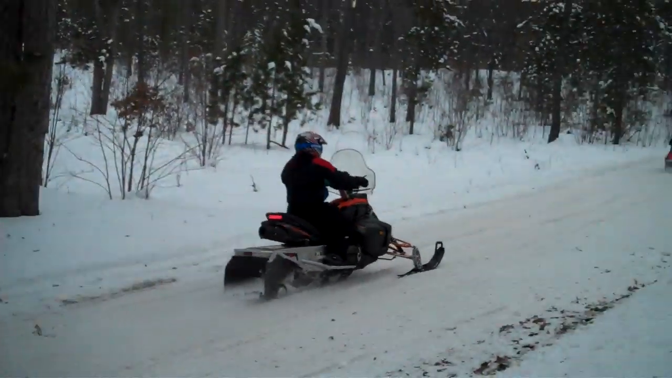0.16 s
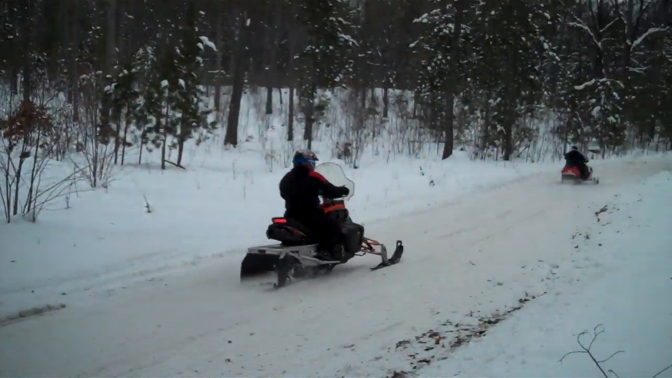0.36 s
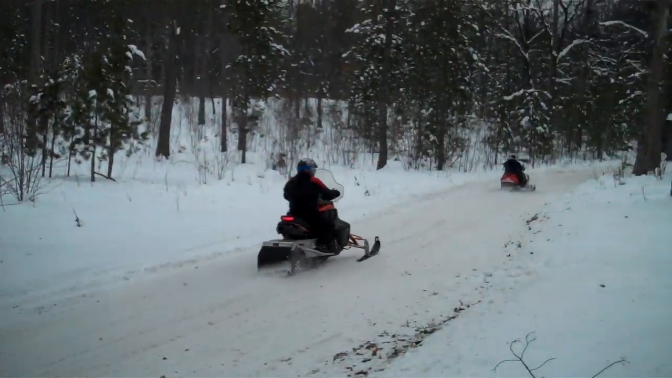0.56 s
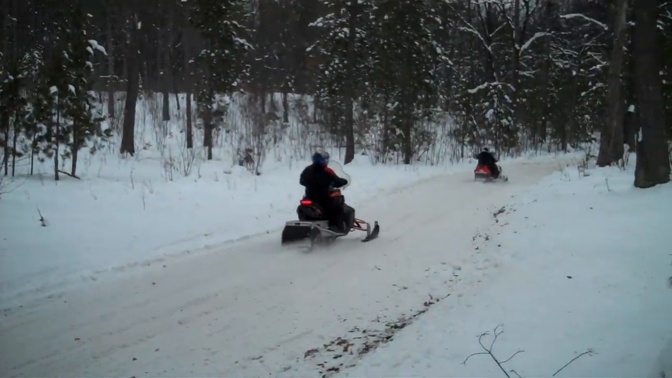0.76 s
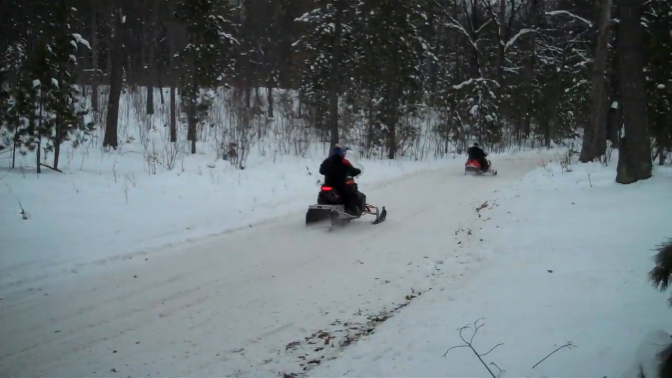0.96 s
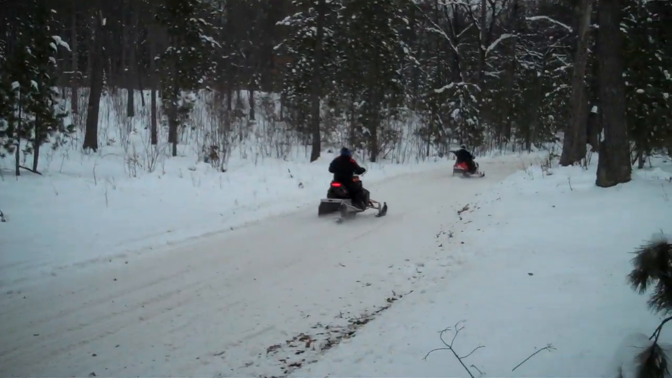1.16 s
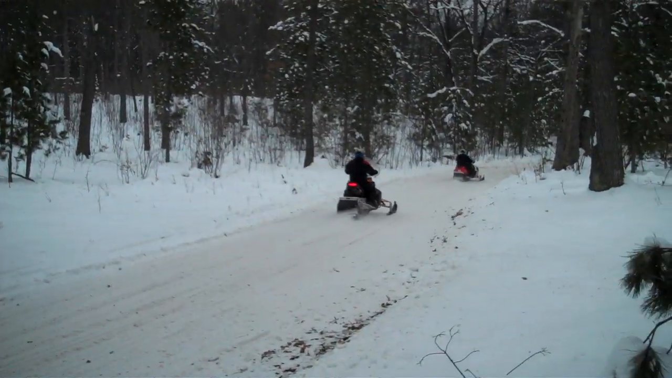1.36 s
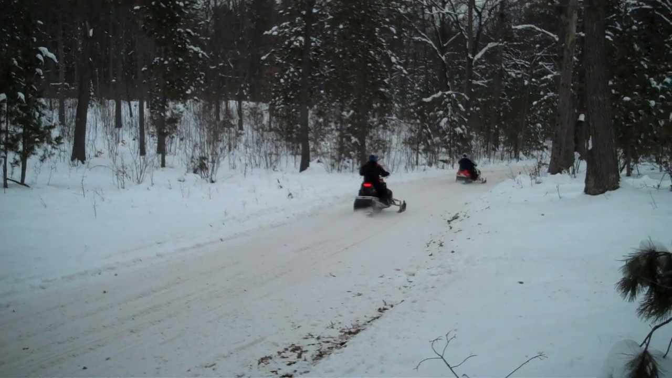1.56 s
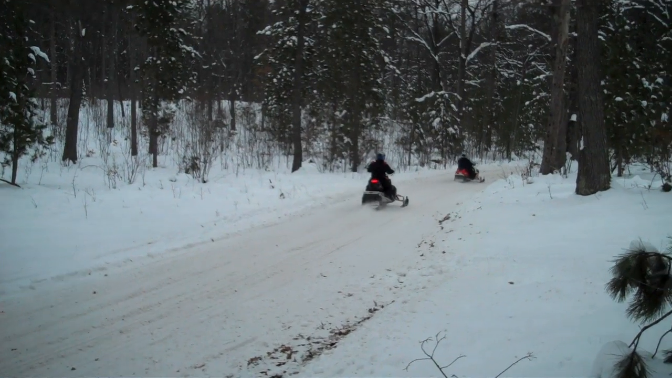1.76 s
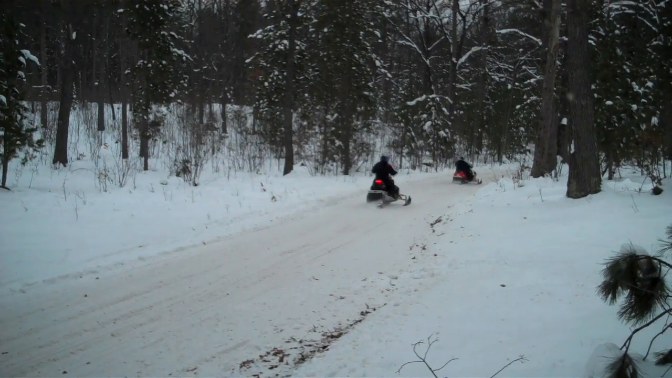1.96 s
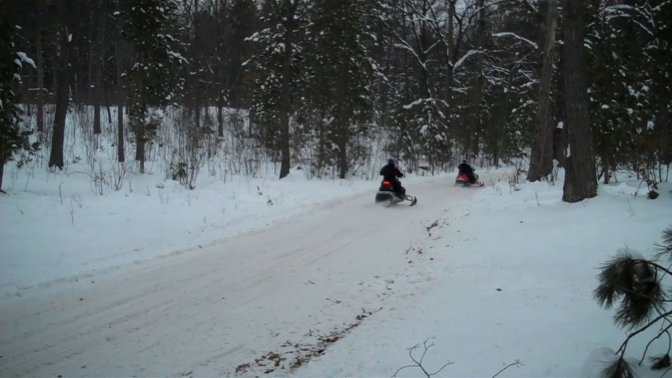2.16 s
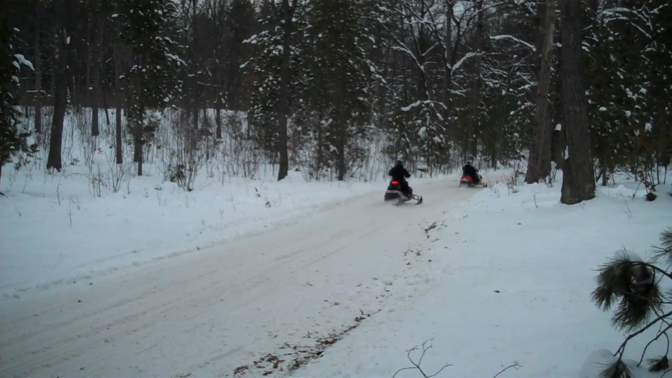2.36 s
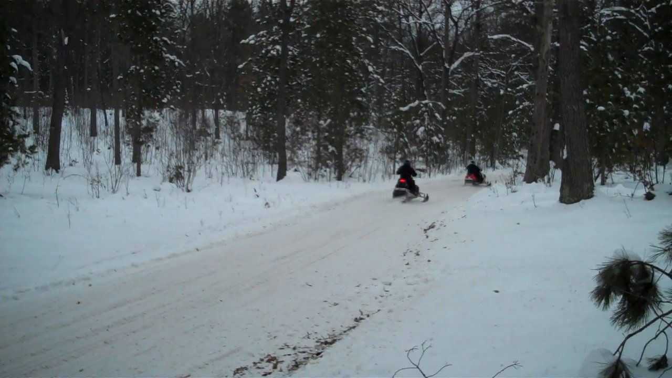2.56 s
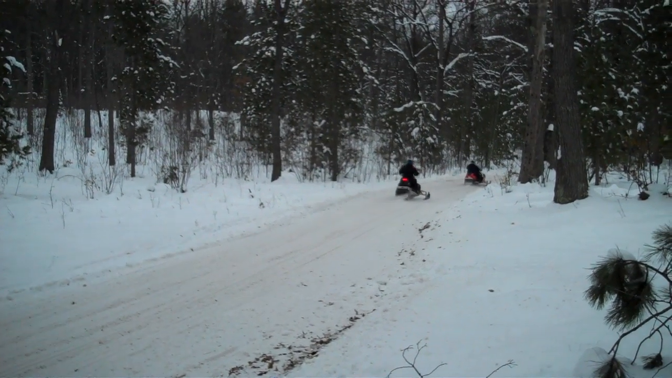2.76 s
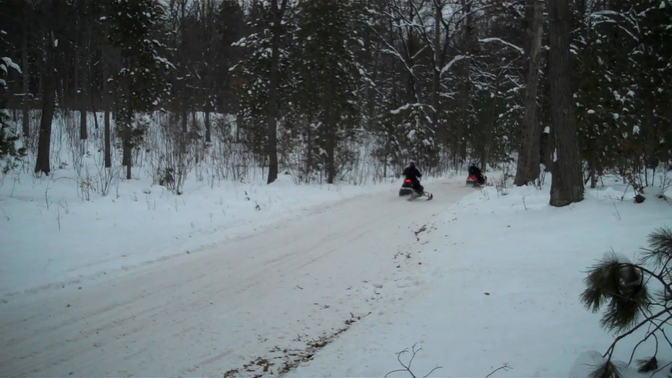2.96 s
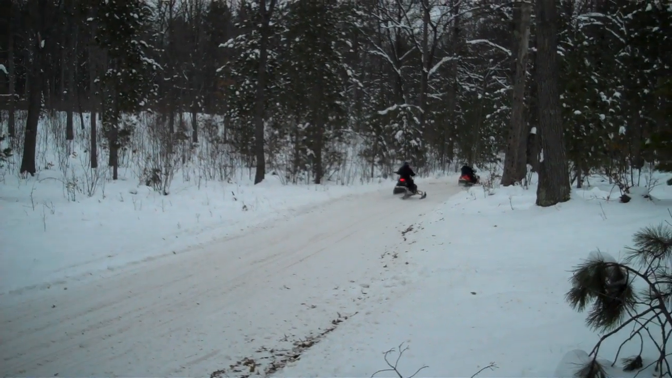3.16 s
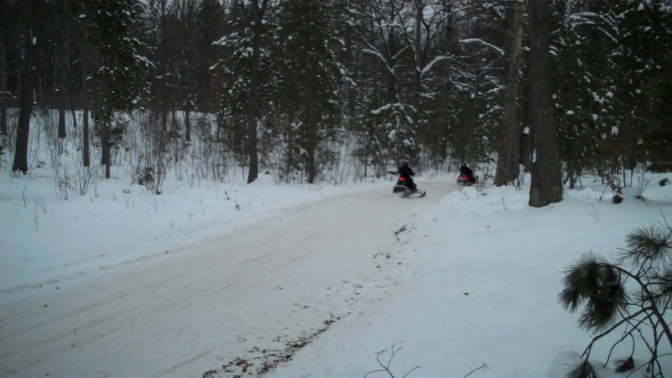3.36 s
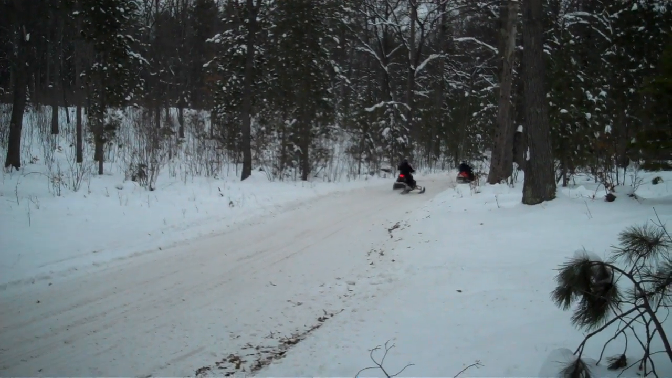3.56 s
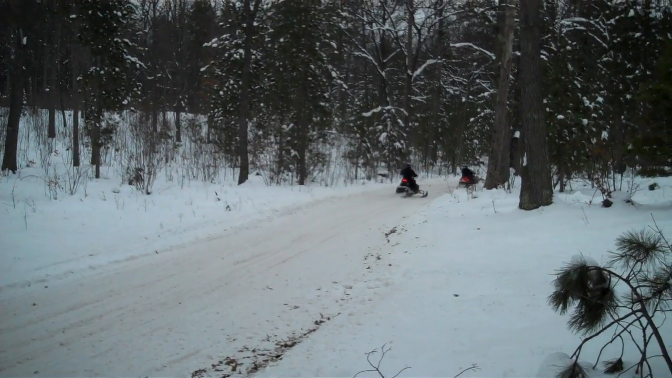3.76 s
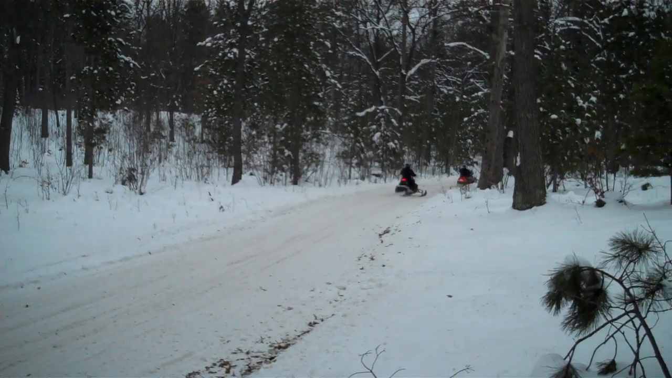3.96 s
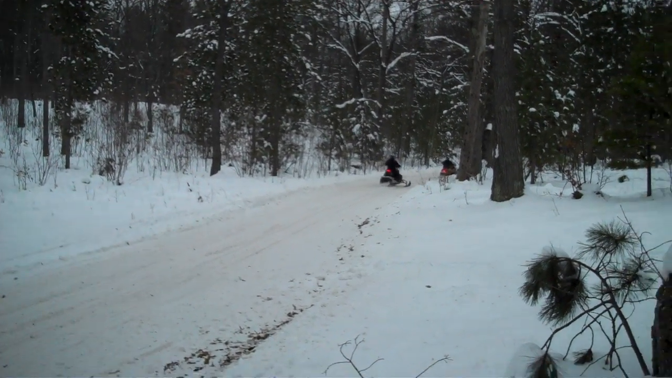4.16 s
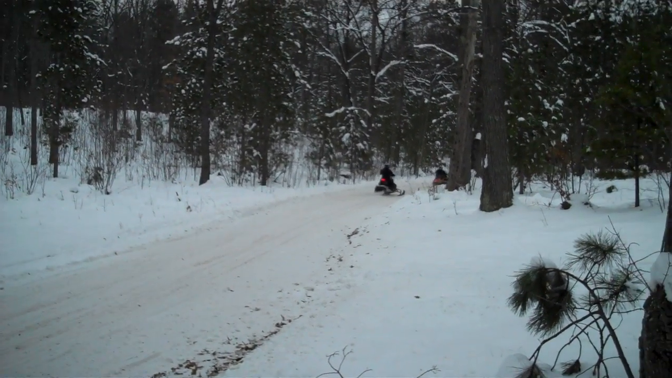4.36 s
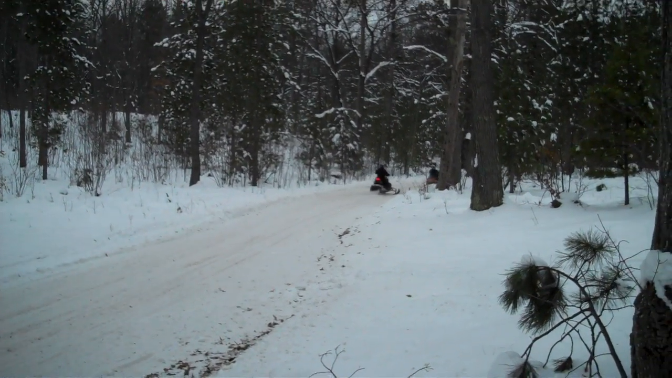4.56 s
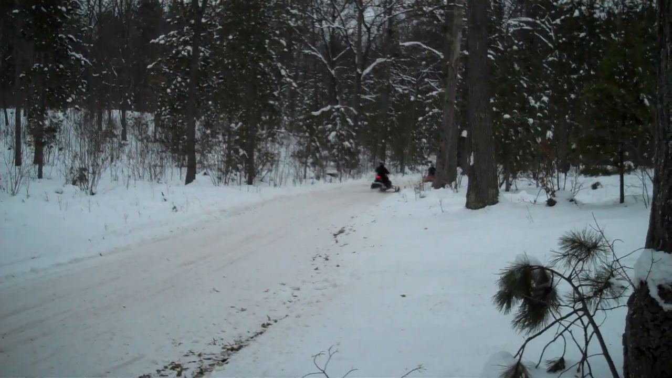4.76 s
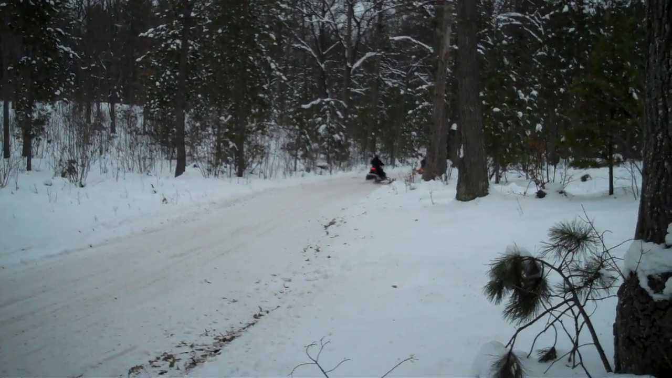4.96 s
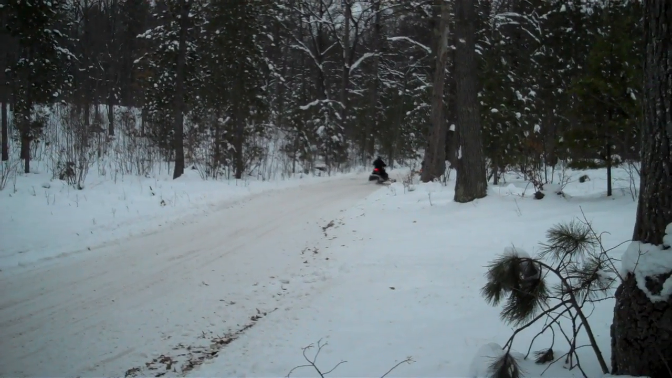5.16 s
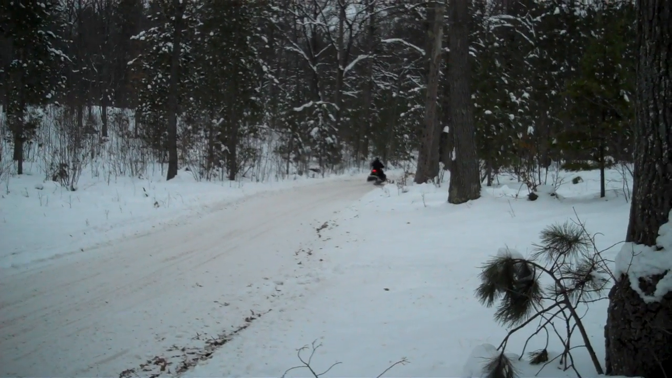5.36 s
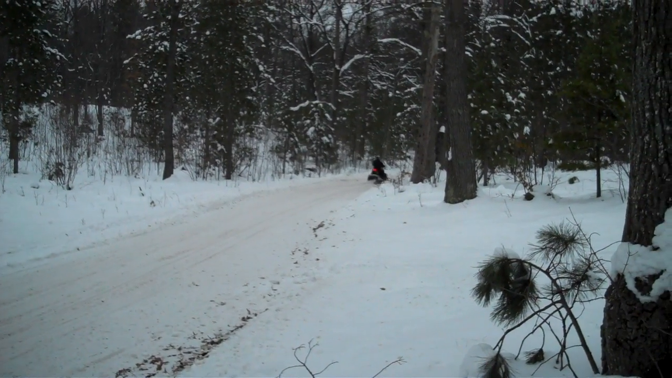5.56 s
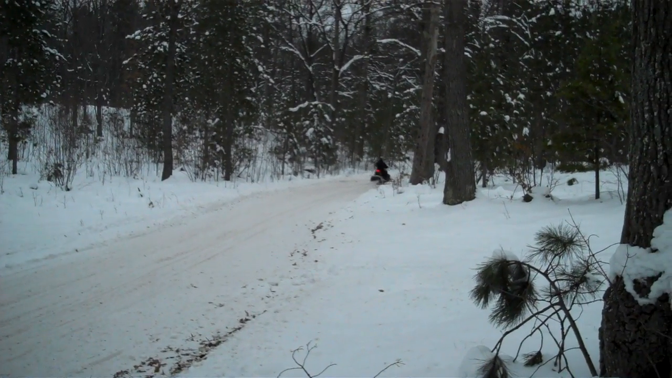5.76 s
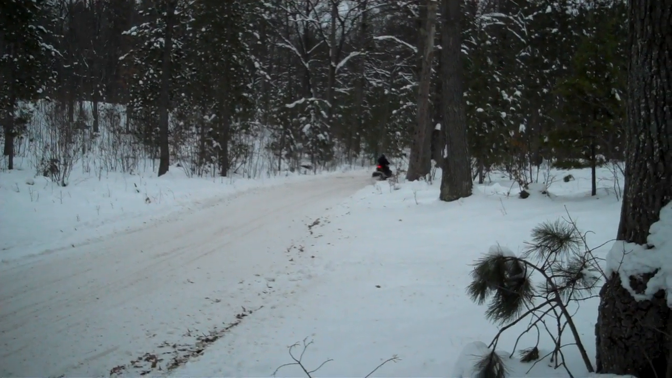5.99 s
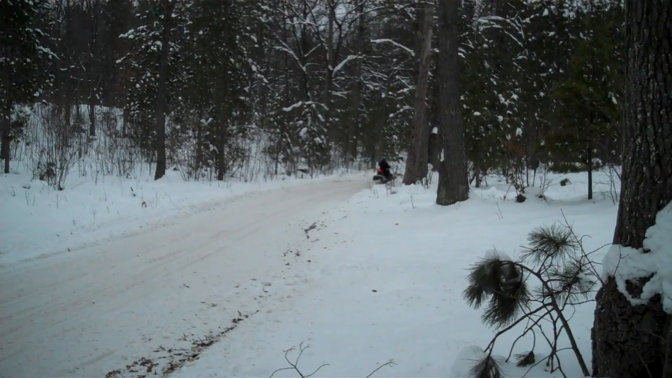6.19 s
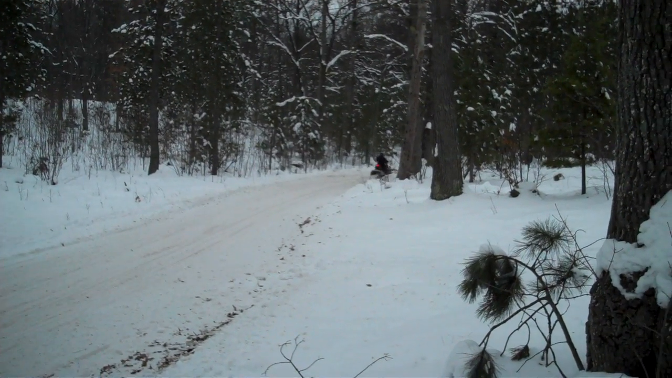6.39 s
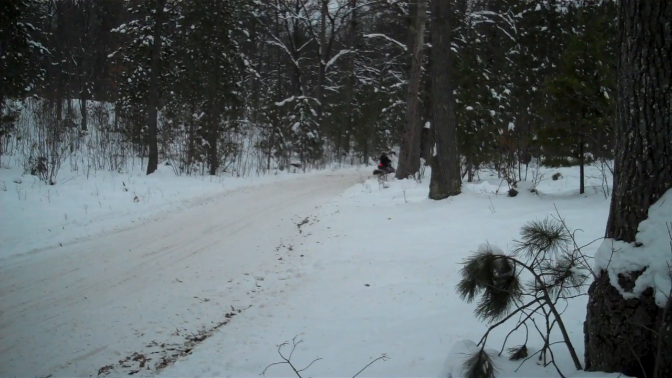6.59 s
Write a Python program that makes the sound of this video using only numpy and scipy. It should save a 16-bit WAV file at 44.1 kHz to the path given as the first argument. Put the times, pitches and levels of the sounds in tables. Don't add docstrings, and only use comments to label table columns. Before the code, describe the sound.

A snowmobile has just passed close and drives off along a snowy forest trail. Its raspy engine buzz, track hum and gritty snow hiss are strong at first, with small metallic rattles. The throttle shuts near two seconds and the note sags to an uneven putter, then two soft revs rise and fall as it fades. Small stereo microphone outdoors, slight hiss.

```python
import sys
import numpy as np
from scipy import signal
from scipy.fft import rfft, irfft, next_fast_len
from scipy.io import wavfile
from scipy.ndimage import uniform_filter1d, map_coordinates

SR = 44100
rng = np.random.default_rng(int(sys.argv[2]) if len(sys.argv) > 2 else 0)


def natural_amplitude(level_db):
    exponent = np.asarray(level_db, float) / 20
    return 10 ** exponent


def dump(signal):
    limited = np.clip(np.atleast_2d(signal).T, -1, 1)
    pcm = np.round(limited * 32767).astype(np.int16)
    wavfile.write(sys.argv[1], SR, pcm)


N = 292366


def seconds():
    return np.arange(N) / SR


def unit(x):
    return x / np.sqrt(np.mean(x ** 2) + 1e-20)


def along(points, hz):
    f, v = np.transpose(points)
    return np.interp(np.log(hz + 1), np.log(f + 1), v, left=v[0], right=v[-1])


def curves(rows):
    s, *cols = np.vstack(rows).T
    return [np.interp(seconds(), s, c) for c in cols]


def wobble(rate_hz):
    knots = rng.standard_normal(int(N * rate_hz / SR) + 4)
    return map_coordinates(knots, [np.arange(N) * rate_hz / SR])


def filtered(x, response):
    m = next_fast_len(N + 8192)
    return irfft(rfft(x, m) * response(np.fft.rfftfreq(m, 1 / SR)), m)[..., :N]


def tone(turns, db, rough_db):
    return np.sqrt(2) * natural_amplitude(db + rough_db * wobble(18)) * np.cos(2 * np.pi * turns)


def patches(patchy_db):
    z = signal.stft(rng.standard_normal((2, N)), nperseg=512)[2]
    field = rng.standard_normal(z.shape[1:])
    field = uniform_filter1d(field, size=6, axis=0)
    field = uniform_filter1d(field, size=14, axis=1)
    return signal.istft(z * natural_amplitude(patchy_db * unit(field)), nperseg=512)[1][:, :N]


# (frequency [Hz], correlation [1])
LIKENESS = [(60, .96), (200, .995), (1500, .985), (2500, .9), (4500, .8), (7000, .82), (9500, .55),
            (12000, .35)]


def spread(pair, spectrum):
    def mid_side(hz):
        angle = np.arccos(np.clip(along(LIKENESS, hz), -1, 1)) / 2
        return natural_amplitude(along(spectrum, hz)) * [np.cos(angle), np.sin(angle)]
    mid, side = filtered(pair, mid_side)
    return unit(np.array([mid + side, mid - side]))


# (time [s], speed [Hz])
CRANK = [(0, 59.52), (.3, 58.73), (1.1, 59.3), (1.55, 58.13), (1.93, 55.9), (2.1, 51.56), (2.38, 45.54),
         (2.75, 40.43), (3.2, 35.99), (4.14, 30.44), (4.45, 34.43), (4.76, 32.68), (5.05, 38.54),
         (5.65, 41.65), (5.81, 41.4), (5.9, 38.04), (6.4, 30.85), (6.63, 33.1)]


def crank():
    return np.cumsum(curves(CRANK)[0] * (1 + .002 * wobble(25))) / SR + .3


# (time [s], level [dB])
PASS = [(0, -29), (.2, -27.5), (.3, -25), (.48, -24), (.8, -25.5), (.96, -27.5), (1.3, -28.5), (1.6, -30),
        (1.92, -32), (2.2, -30.5), (2.56, -33.5), (2.8, -34), (3.65, -37.5), (3.9, -39), (5.1, -43.5),
        (5.9, -44.5), (6.1, -47), (6.63, -45.5)]
# (start [s], stop [s])
OPEN_SPELLS = [
    (-.1, 1.96),
    (4.15, 4.55),
    (4.55, 4.73),
    (4.73, 5.83),
    (6.38, 7),
]
# (push [dB], bark [dB], skipped firings [dB])
OPEN_LEVELS = [
    (1, -3.5, -12),
    (1.5, -19, -24),
    (-1.5, -30, -2.5),
    (-0.5, -7.5, -28),
    (1, -11, -25),
]
HAND_S = .04
SHUT_BARK_DB, SHUT_SKIP_DB, SHUT_PUSH_DB = -28, -8.5, -2
WEAK_UNDER_HZ, WEAK_DB_PER_HZ = 38.6, 1.6
STUMBLE_DB, STUMBLE_S = 2.5, 0.17
SAG_DB_PER_S = 3


def throttle():
    t = seconds()
    start, stop = np.transpose(OPEN_SPELLS)[..., None]
    opening = np.clip((t - start) / HAND_S + .5, 0, 1)
    closing = np.clip((t - stop) / HAND_S + .5, 0, 1)
    grip = opening - closing
    opened = np.clip(grip.sum(0), 0, 1)
    weak_db = SHUT_PUSH_DB - WEAK_DB_PER_HZ * np.maximum(WEAK_UNDER_HZ - curves(CRANK)[0], 0)
    decay = np.exp(-1 / (STUMBLE_S * SR))
    lately_open = signal.lfilter([1 - decay], [1, -decay], opened)
    shut_db = (weak_db, SHUT_BARK_DB, SHUT_SKIP_DB + STUMBLE_DB * lately_open)
    sag_db = (SAG_DB_PER_S * (grip * (t - start)).sum(0), 0, 0)
    pass_db = curves(PASS)[0]
    levels = zip(np.transpose(OPEN_LEVELS), shut_db, sag_db)
    return [opened] + [pass_db + held @ grip + (1 - opened) * shut - sag for held, shut, sag in levels]


# (frequency [Hz], level [dB])
PIPE_OPEN = [(33, -13), (55, 1), (98, -20), (112, -1.5), (160, -2), (177, -14), (200, -1.5), (290, 3.5)]
# (frequency [Hz], level [dB])
PIPE_SHUT = [(31, -10), (40, -16), (53, -15), (95, 1.5), (120, 1.5), (200, -3.5), (225, 7), (270, 5)]
# (multiple of crank [1], level re order 5 [dB])
SIDE_ORDERS = [(2, -11), (6, -16)]
NEAR_DB, NEAR_S = 2.5, .2
BOOM_DB, BOOM_S = 10, 0.44
OPEN_FIFTH_DB, SHUT_FIFTH_DB = -4.5, -13


def pipe_orders(turns, crank_hz, opened, push_db):
    t = seconds()

    def pipe_db(k):
        open_db, shut_db = along(PIPE_OPEN, k * crank_hz), along(PIPE_SHUT, k * crank_hz)
        return push_db + opened * open_db + (1 - opened) * shut_db

    fifth_db = pipe_db(5) + opened * OPEN_FIFTH_DB + (1 - opened) * SHUT_FIFTH_DB
    boom_db = BOOM_DB * np.exp(-t / BOOM_S)
    orders = [(1, pipe_db(1)), (3, pipe_db(3)), (4, pipe_db(4) + boom_db), (5, fifth_db)]
    orders += [(k, fifth_db + db) for k, db in SIDE_ORDERS]
    return sum(tone(k * turns - 0.018 * k * k, db, rough_db=.3 * k) for k, db in orders)


# (multiple of crank [1], level re skip level [dB])
HALF_ORDERS = [(1.5, -17), (2.5, -8.5), (3.5, -1.5), (4.5, -10.5), (5.5, -17)]
# (multiple of crank [1], level re drone [dB])
DRONE_ORDERS = [(2, -2), (6, -5), (7, -6), (8, -16)]
DRONE_OPEN_DB = -18
DRONE_SHUT_DB, DRONE_TIRES_DB_PER_S = -4, 5
DRONE_TOP_HZ, DRONE_DB_PER_HZ = 310, .17


def uneven_orders(turns, crank_hz, opened, push_db, skip_db):
    open_db = curves(PASS)[0] + DRONE_OPEN_DB
    shut_db = push_db + DRONE_SHUT_DB - DRONE_TIRES_DB_PER_S * (seconds() - 2)
    drone_db = opened * open_db + (1 - opened) * shut_db
    orders = [(k, skip_db + db) for k, db in HALF_ORDERS]
    for k, db in DRONE_ORDERS:
        absorbed_db = DRONE_DB_PER_HZ * np.maximum(k * crank_hz - DRONE_TOP_HZ, 0)
        orders.append((k, drone_db + db - absorbed_db))
    return sum(tone(k * turns + .13 * k * k, db, rough_db=3.5) for k, db in orders)


# (frequency [Hz], level [dB])
OUTLET = [(200, -60), (330, 6.5), (400, -10), (520, 8.5), (620, 5), (800, -14), (1000, -10.5), (1150, 2),
          (1500, -6.5), (2000, -2.5), (2500, -20.5), (3500, -9.5), (6000, -90)]


def muffler_bark(turns, crank_hz, bark_db):
    fired = np.diff(np.floor(turns), prepend=0) * natural_amplitude(.7 * rng.standard_normal(N)) / np.sqrt(crank_hz)
    smear = lambda hz: np.exp(-1j * np.pi * (hz / 420) ** 2)
    bark = unit(filtered(fired, lambda hz: natural_amplitude(along(OUTLET, hz)) * smear(hz)))
    return natural_amplitude(bark_db + 0.16 * wobble(5.27)) * bark


def exhaust(turns):
    crank_hz = curves(CRANK)[0]
    opened, push_db, bark_db, skip_db = throttle()
    push_db = push_db + NEAR_DB * np.exp(-seconds() / NEAR_S)
    clean = pipe_orders(turns, crank_hz, opened, push_db)
    lumpy = uneven_orders(turns, crank_hz, opened, push_db, skip_db)
    return clean + lumpy + muffler_bark(turns, crank_hz, bark_db)


# (time [s], lug rate [Hz], overtone level [dB])
LUGS = [(0, 151.2, -37), (.3, 147.5, -30), (.6, 150, -41.5), (1.9, 149.8, -40), (2.15, 144.3, -48),
        (2.8, 141, -52), (3.4, 140.4, -53.5), (3.6, 141.8, -64), (4.25, 148.1, -63), (4.95, 144.7, -57.5),
        (5.35, 139.6, -65)]
HUM_DB, HUM_PEAK_S, HUM_FADES_DB_PER_S = -21.5, 0.16, 13.5
SECOND_SLACK_DB = -8


def lug_hum():
    lug_hz, over_db = curves(LUGS)
    hum_db = HUM_DB - HUM_FADES_DB_PER_S * np.abs(seconds() - HUM_PEAK_S)
    second_db = over_db + SECOND_SLACK_DB * (1 - throttle()[0])
    lugs = np.cumsum(lug_hz * (1 + 0.0033 * wobble(12))) / SR
    idler = tone(4 / 3 * lugs, hum_db - 14, rough_db=4)
    harmonics = [(1, hum_db), (2, second_db), (3, over_db - 2)]
    return idler + sum(tone(k * lugs, db, rough_db=2.5) for k, db in harmonics)


# (time [s], frequency [Hz], level [dB])
WHINE = [(.5, 1700, -62), (.8, 1712, -36), (1.3, 1715, -42), (1.7, 1765, -36), (2, 1750, -40),
         (2.2, 1715, -54), (2.7, 1690, -46), (3.15, 1658, -44), (3.4, 1650, -75)]


def chain_whine():
    whine_hz, whine_db = curves(WHINE)
    teeth = np.cumsum(whine_hz * (1 + .003 * wobble(15))) / SR
    return tone(teeth, whine_db, rough_db=3)


# (frequency [Hz], density [dB per Hz])
RUMBLE = [(20, -26), (45, -16), (85, -10), (130, -6), (190, -8), (260, -13), (400, -12), (600, -9),
          (850, -11), (1000, -19), (1300, -50)]
# (frequency [Hz], density [dB per Hz])
CHURN = [(600, -27), (900, -7), (1040, -11.5), (1180, -2), (1480, -0.5), (1560, 5), (1640, -1.5), (2090, 0),
         (2320, -3.5), (2600, -1), (3000, -7), (3700, -12), (4300, -26), (6000, -40)]
# (frequency [Hz], density [dB per Hz])
SPRAY = [(3000, -58), (3900, -2), (4800, -0.5), (5700, -0.5), (7000, -12.5), (8500, -12.5), (11000, -19.5),
         (14500, -10.5)]
RUMBLE_DB, RUMBLE_LOAD_DB, RUMBLE_DB_PER_HZ = -9, 2.5, 0.118
SPRAY_DB_PER_HZ = 0.1431


def snow(turns):
    churn_db = curves(PASS)[0]
    faster_hz = curves(CRANK)[0] - CRANK[-1][1]
    rumble_db = churn_db + RUMBLE_DB + RUMBLE_LOAD_DB * throttle()[0] + RUMBLE_DB_PER_HZ * faster_hz
    spray_db = churn_db + SPRAY_DB_PER_HZ * faster_hz
    shake = np.exp(-3 * (turns % 1))
    rumble = natural_amplitude(rumble_db) * spread(patches(1.98) * (1 + 0.017 * shake), RUMBLE)
    churn = natural_amplitude(churn_db - 0.93) * spread(patches(0.68) * (1 + 0.061 * shake), CHURN)
    spray = natural_amplitude(spray_db - 11.5) * spread(patches(0.92) * (1 + 0.29 * shake), SPRAY)
    return rumble + churn + spray


# (frequency [Hz], density [dB per Hz])
TICK = [(2500, -30), (3400, -4), (4300, -11), (7000, -4), (9000, -1), (11000, 0), (14300, 7)]
# (time [s], length [s], level [dB])
BUMPS = [(0.513, 0.052, -37.5), (.68, 0.12, -39.5), (0.859, 0.11, -39.5), (1.15, 0.12, -47.5),
         (1.46, .02, -43.5), (2.162, .01, -52.5), (2.351, .02, -56), (2.802, .12, -52.5),
         (3.22, 0.18, -63.5), (3.532, 0.043, -56), (3.869, 0.011, -63), (4.222, .02, -66)]
SETTLE_DB_PER_S = 90
LOOSE_DB, LOOSE_FADES_DB_PER_S = -45, 6.5
DULL_S, DULL_HZ = 2.3, 8900


def ticks(turns):
    t = seconds()
    bump_s, length_s, bump_db = np.transpose(BUMPS)[..., None]
    shaken_db = bump_db - SETTLE_DB_PER_S * np.maximum(np.abs(t - bump_s) - length_s / 2, 0)
    rattle_db = np.maximum(shaken_db.max(0), LOOSE_DB - LOOSE_FADES_DB_PER_S * t)
    cycle = np.floor(turns).astype(int)
    size = natural_amplitude(2.6 * rng.standard_normal((cycle.max() + 1, 2)))[cycle]
    since_s = (turns % 1) / curves(CRANK)[0]
    blow = np.exp(-np.abs(since_s - .003) / .001)
    rebound = 0.19 * np.exp(-np.abs(since_s - .01) / 0.0091)
    burst = size[:, 0] * blow + size[:, 1] * rebound + .07
    bright = spread(burst * rng.standard_normal((2, N)), TICK)
    dull = filtered(bright, lambda hz: 1 / (1 + (hz / DULL_HZ) ** 4))
    near = np.exp(-(t / DULL_S) ** 2)
    return natural_amplitude(rattle_db + 12) * (near * bright + (1 - near) * natural_amplitude(7.5) * dull)


# (time [s], lug rate [Hz], level [dB])
AHEAD = [(5.4, 125, -80), (5.55, 127.4, -58.5), (5.9, 129.2, -57.5), (6.2, 128.6, -55.5),
         (6.42, 129, -58.5), (6.63, 129, -56)]


def sled_ahead():
    ahead_hz, ahead_db = curves(AHEAD)
    lugs = np.cumsum(ahead_hz) / SR
    return sum(tone(k * lugs, ahead_db - 4 * k + 8, rough_db=4) for k in (2, 3))


# (frequency [Hz], density [dB per Hz])
AIR = [(20, -24.5), (45, 0.5), (80, 2), (150, -14), (300, -16.5), (600, -15.5), (1100, -15), (1600, -53)]
AIR_DB = -52


def forest():
    air = unit(filtered(patches(4.3), lambda hz: natural_amplitude(along(AIR, hz))))
    return natural_amplitude(AIR_DB + 2.7 * np.array([wobble(1.3), wobble(1.46)])) * air


def scene():
    turns = crank()
    sled = exhaust(turns) + lug_hum() + chain_whine() + snow(turns) + ticks(turns)
    return sled + sled_ahead() + forest()


def top_cut(x):
    return signal.sosfilt(signal.butter(12, 15130, fs=SR, output="sos"), x)


# (resonance [Hz], width [Hz])
PORTS = [
    (7186, 485),
    (6020, 1510),
]
# (frequency [Hz], level [dB])
RIGHT_SHADE = [(4500, 0), (7000, -3), (10000, -4), (12000, -10), (14200, -16)]
SELF_NOISE_DB = [
    [-64],
    [-63.5],
]
LEFT_LAG_S, TOP_HZ = 2.6e-5, 14270


def record(dry):
    cavity = lambda f: np.array([c * c / (c * c - f * f + 1j * f * w) for c, w in PORTS])
    place = lambda f: [np.exp(-2j * np.pi * f * LEFT_LAG_S), natural_amplitude(along(RIGHT_SHADE, f))]
    heard = filtered(dry, lambda f: cavity(f) * place(f))
    heard = heard + natural_amplitude(SELF_NOISE_DB) * rng.standard_normal(dry.shape)
    heard = filtered(heard, lambda f: f < TOP_HZ)
    return top_cut(heard)


dry = scene()
out = record(dry)
dump(out)
```